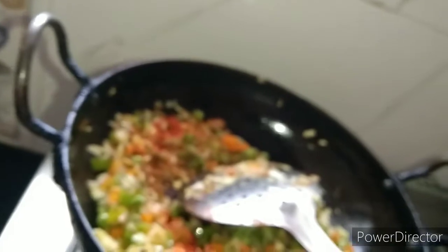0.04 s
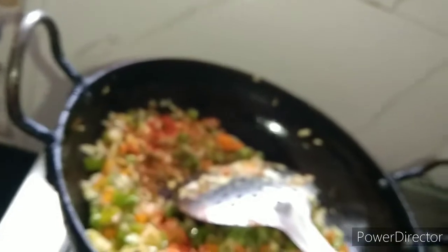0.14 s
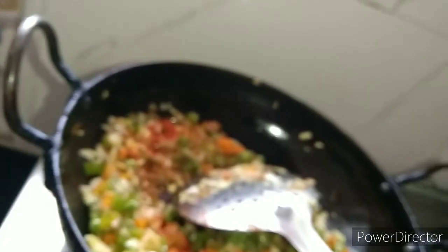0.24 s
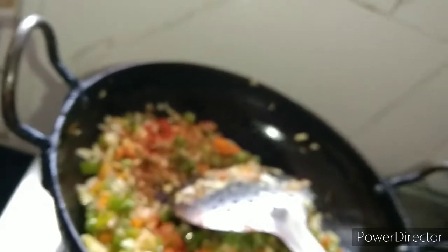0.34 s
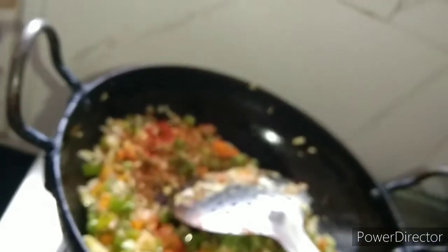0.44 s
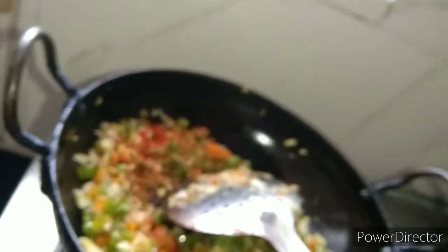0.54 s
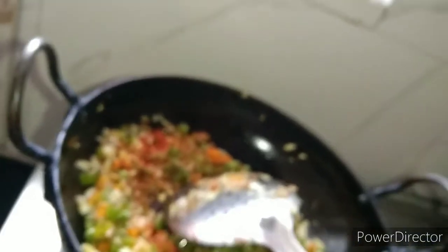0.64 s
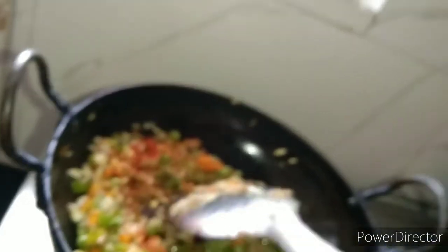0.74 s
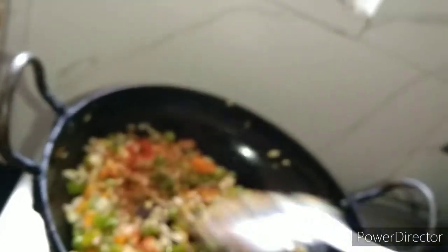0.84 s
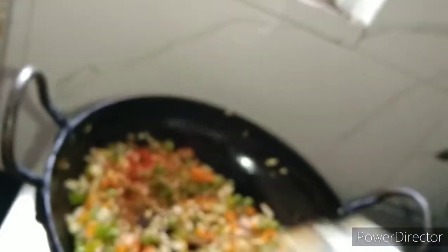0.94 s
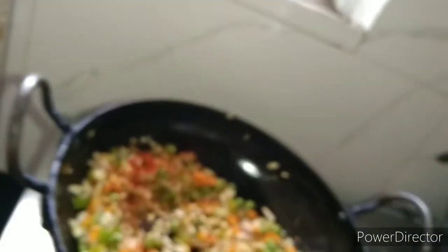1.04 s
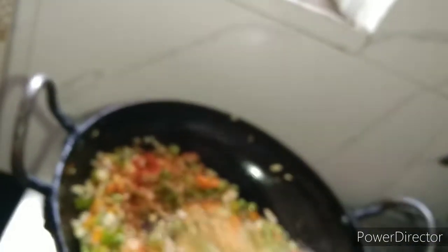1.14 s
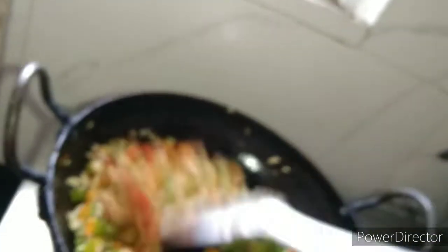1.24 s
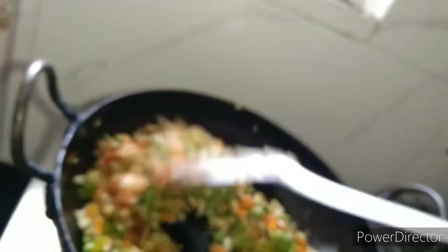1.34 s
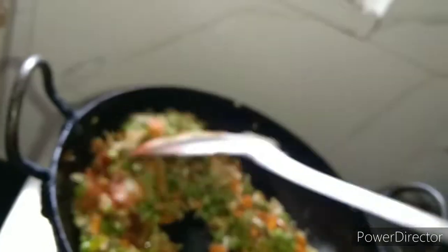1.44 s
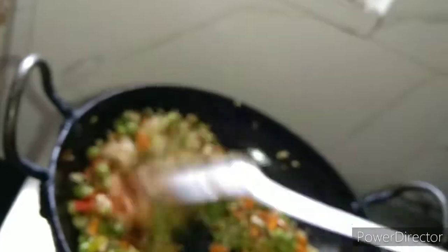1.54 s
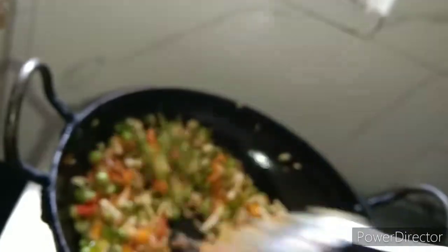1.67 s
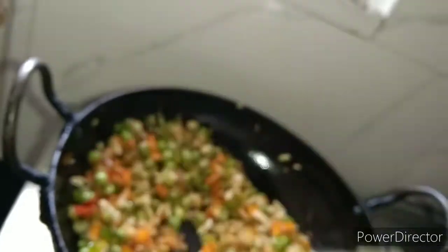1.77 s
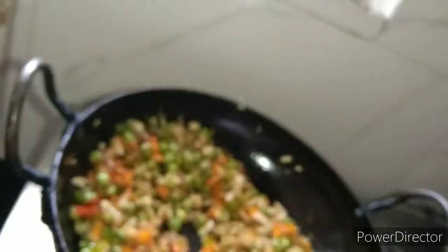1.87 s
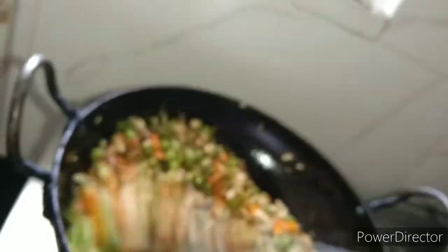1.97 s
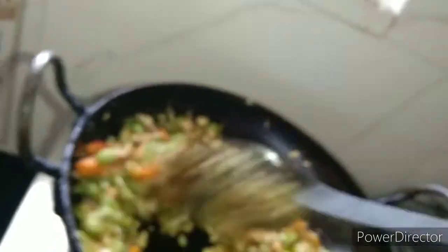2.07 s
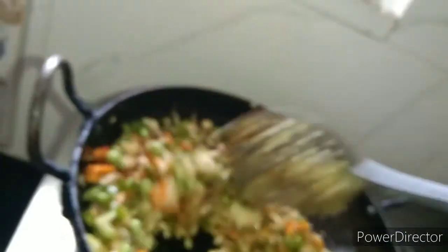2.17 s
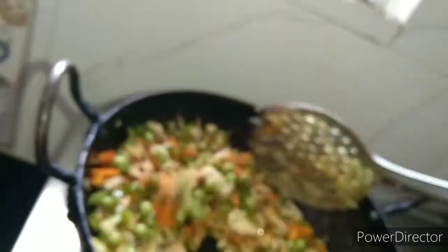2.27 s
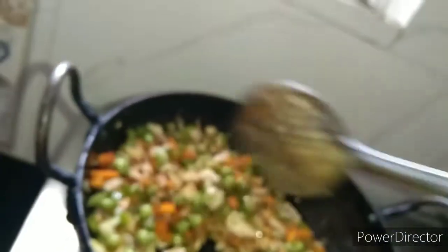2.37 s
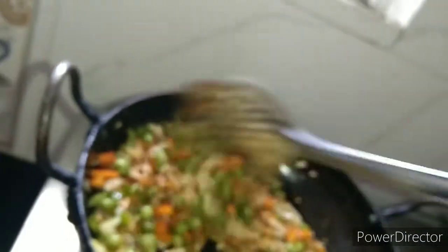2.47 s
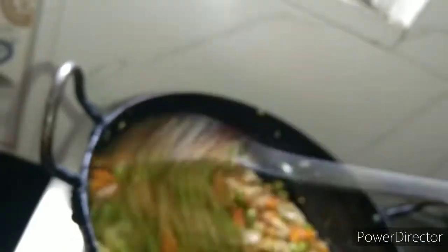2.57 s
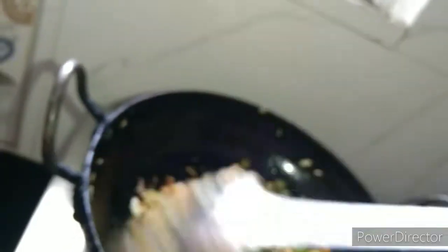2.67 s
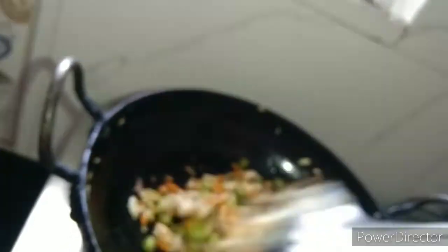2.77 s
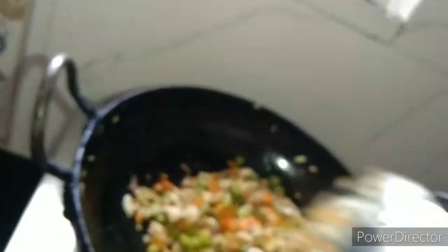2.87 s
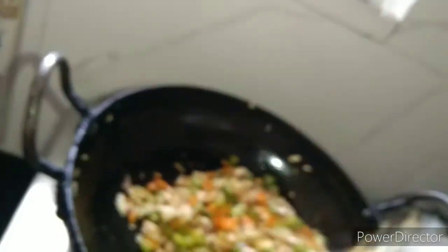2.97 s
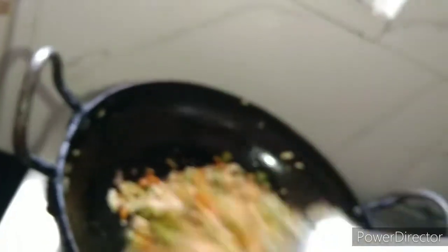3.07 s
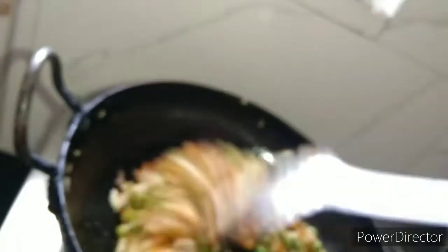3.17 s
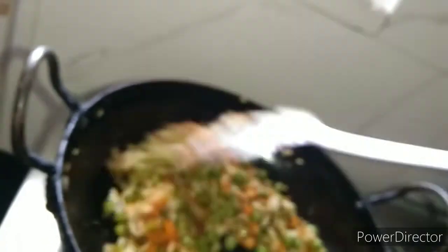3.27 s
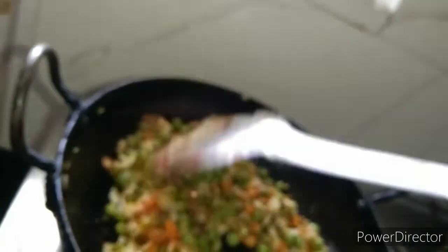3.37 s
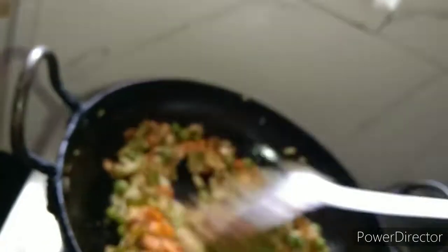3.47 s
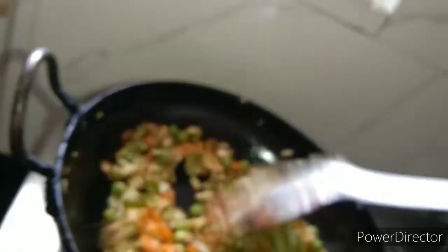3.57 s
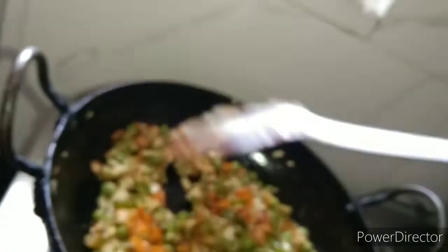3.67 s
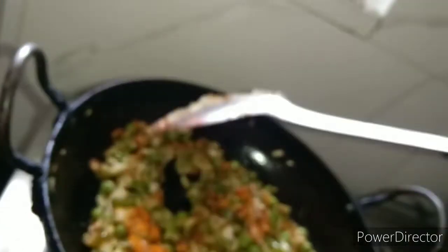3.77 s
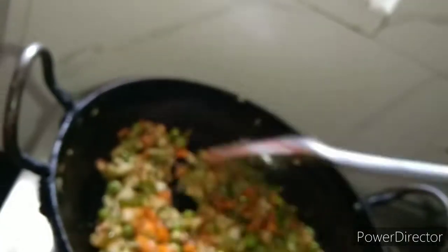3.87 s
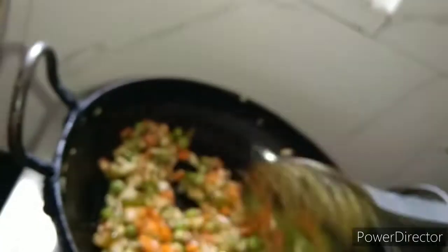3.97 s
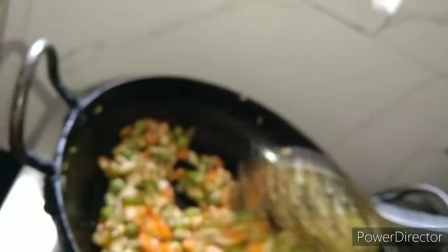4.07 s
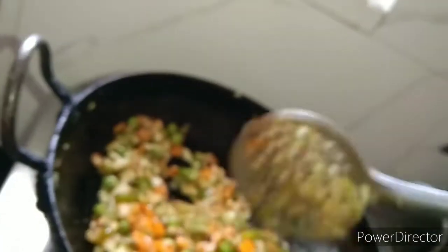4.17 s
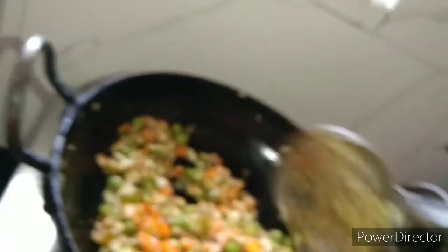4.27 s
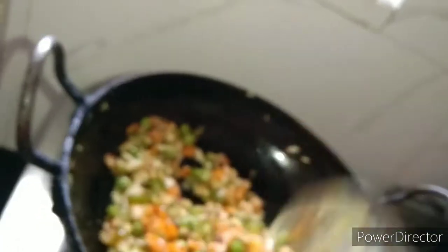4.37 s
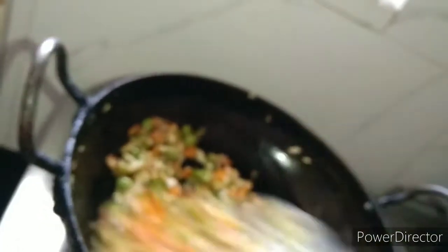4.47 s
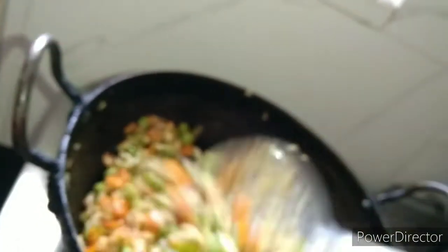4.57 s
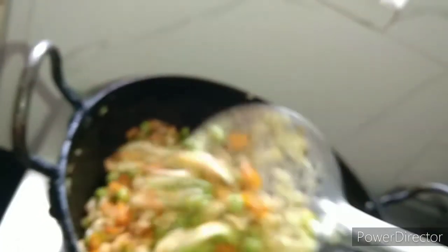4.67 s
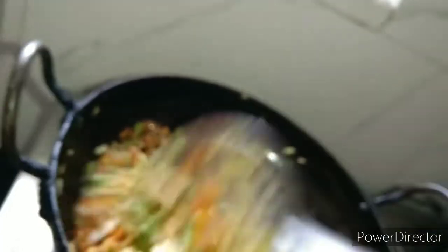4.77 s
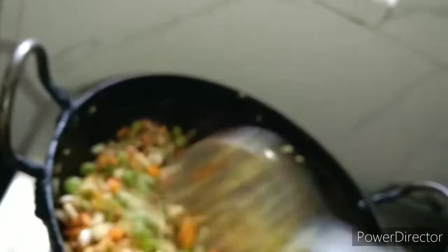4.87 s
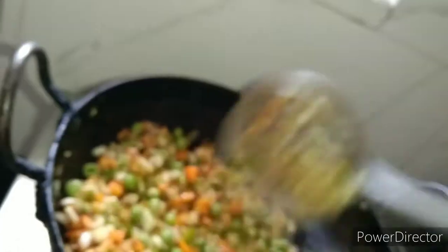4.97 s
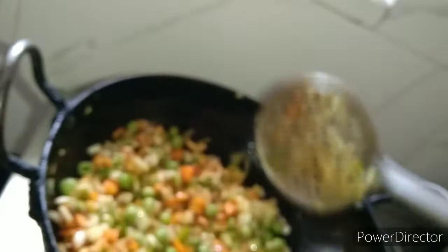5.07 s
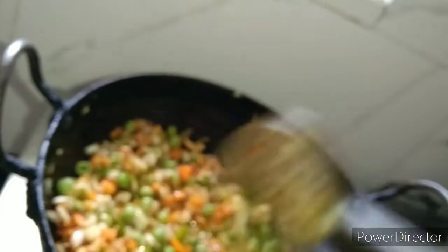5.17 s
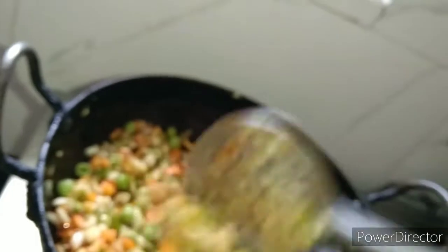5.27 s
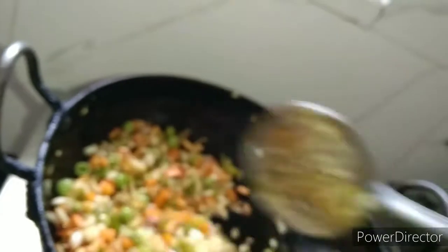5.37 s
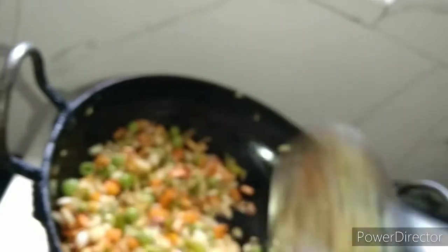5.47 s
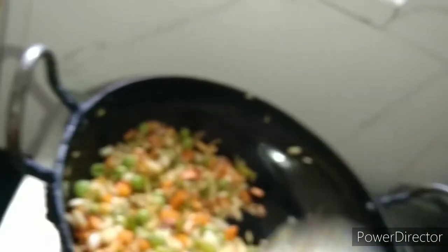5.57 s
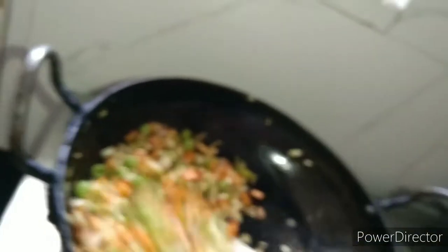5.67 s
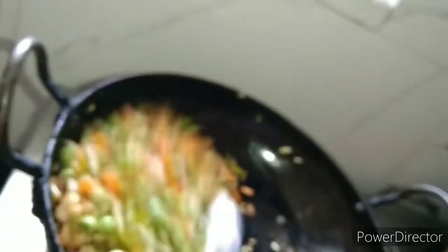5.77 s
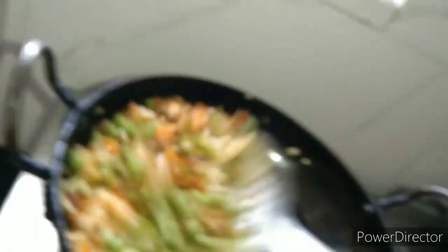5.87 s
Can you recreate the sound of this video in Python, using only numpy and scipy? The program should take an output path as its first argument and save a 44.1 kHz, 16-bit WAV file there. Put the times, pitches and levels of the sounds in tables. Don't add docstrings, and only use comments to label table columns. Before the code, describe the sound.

A metal spatula knocks and scrapes an iron pan as chopped vegetables, quiet at first, break into a strong steady sizzle in a hard-walled kitchen.

```python
import sys
import numpy as np
from scipy import signal
from scipy.io import wavfile
from scipy.ndimage import uniform_filter1d

SR = 44100
rng = np.random.default_rng(int(sys.argv[2]) if len(sys.argv) > 2 else 0)


def voltage_ratio(level):
    return 10 ** (np.asarray(level, float) / 20)


def persist_wave(psi):
    counts = np.round(np.clip(psi, -1, 1) * 32767).astype(np.int16)
    wavfile.write(sys.argv[1], SR, np.atleast_2d(counts).T)


N = 261513
CLOCK = np.arange(N) / SR

# time in seconds, sizzle level in dB.
SIZZLE_LEVEL = [(0.0, -56), (0.3, -54.5), (0.6, -58.5), (0.84, -56.5), (1.0, -55.5), (1.2, -57),
                (1.37, -39.5), (1.6, -41.5), (1.96, -38.5), (2.55, -43.5), (3.3, -39.5), (3.9, -39),
                (4.06, -39.5), (4.25, -37.5), (4.6, -40), (4.79, -43), (5.05, -40.5), (5.93, -40)]
# frequency in Hz, density in dB per Hz.
SIZZLE_COLOUR = [(880, -34), (1500, -16.5), (1870, -29.5), (2160, -13.5), (2370, -14.5), (3880, -3.5),
                 (4870, 1), (5280, -1), (6500, -1), (7460, 3), (10900, 5), (12200, 4.5), (14800, -5),
                 (15500, -7), (16000, -20)]
# frequency in Hz, density in dB per Hz.
SIMMER_COLOUR = [(71, -50), (120, -22), (243, -17.5), (376, -3.5), (404, -22), (446, -20), (551, 0),
                 (878, -6), (1010, 7.5), (1210, -4), (1420, -3), (1800, -2.5), (3500, -17.5), (4550, -85),
                 (7700, -120)]
# frequency in Hz, density in dB per Hz.
FLAME_COLOUR = [(12, -53), (20, 4), (35, -6.5), (54, -5), (78, -3), (103, -13), (113, -11), (160, -23),
                (210, -91), (350, -120)]
# centre in seconds, lift in dB, half length in seconds.
FLARES = [
    (0.415, 8, 0.23),
    (.85, 2, .08),
    (1.2, 1, .12),
    (1.98, 13, 0.16),
    (2.55, 4.5, 0.32),
    (3.8, 1, 0.54),
    (4.85, 6, 0.38),
    (5.85, 11.5, 0.14),
]
# frequency in Hz, density in dB per Hz.
AIR_COLOUR = [(59, -25), (100, -17), (257, -8.5), (282, -9.5), (369, -8.5), (686, -11.5), (874, -5),
              (948, -13.5), (2500, -32), (3250, -55), (5500, -120)]
# start in seconds, rise in seconds, length in seconds, drag on the bowl in dB,
# scratch of the edge in dB.
STROKES = [(0.0, 0.0017, 0.11, -47, -60), (0.104, 0.04, 0.087, -31, -44), (0.806, 0.042, .07, -42.5, -37.5),
           (0.866, 0.039, 0.095, -35, -34), (0.96, 0.033, 0.11, -46.5, -40.5),
           (1.295, .005, 0.037, -32.5, -21.5), (1.368, 0.037, 0.069, -34, -42),
           (2.486, 0.014, 0.08, -49, -61), (2.583, 0.0067, 0.037, -55, -35.5),
           (2.608, 0.054, 0.074, -62, -36), (3.174, 0.047, 0.18, -48.5, -32),
           (4.657, 0.047, 0.084, -34, -28.5), (4.738, 0.013, 0.16, -47.5, -51),
           (5.663, .008, 0.068, -79, -27.5), (5.683, 0.063, 0.058, -74, -31),
           (5.778, 0.045, 0.083, -78, -30.5), (5.843, 0.0073, 0.2, -36, -39)]
# frequency in Hz, width in Hz, level in dB.
BLADE_MODES = [(1010, 60, -8), (3000, 100, -12), (4230, 70, -2), (4660, 50, 0), (5020, 50, -1),
               (5600, 80, -5), (5890, 60, -5), (6320, 120, -1), (7520, 80, -2), (8280, 60, -4),
               (9550, 180, -5), (10600, 80, -6)]
# frequency in Hz, density in dB per Hz.
CRACK_COLOUR = [(1000, -20), (1700, -3), (2360, -4.5), (3040, 0.5), (3670, -1), (5540, -2.5), (6440, -3),
                (10700, -8.5), (14400, -16), (16000, -79)]
# frequency in Hz, density in dB per Hz.
THUD_COLOUR = [(88, -42), (150, -19.5), (269, -13), (427, -3.5), (552, -11), (669, 0.5), (1010, -1),
               (1280, -2.5), (1360, -6), (1520, -4), (1640, -10.5), (2010, -9.5), (2200, -14),
               (2860, -24.5), (4840, -120)]
# start in seconds, edge crack in dB, bowl thud in dB, ring in dB,
# contact time in seconds.
KNOCKS = [(0.1006, -17, -32.5, -41, 0.015), (0.1232, -24, -49, -22.5, 0.01),
          (0.139, -17.5, -30.5, -30.5, 0.0095), (0.8195, -49, -47, -60, 0.012),
          (0.8742, -26.5, -30.5, -49, 0.019), (1.2, -17, -33.5, -38, 0.013),
          (1.2919, -20.5, -21, -25, 0.0059), (1.3293, -32, -48, -30, 0.003), (1.4055, -41, -42, -47, 0.01),
          (2.585, -50, -64, -52.5, 0.007), (2.641, -50, -64, -52, 0.0059), (3.189, -36, -36.5, -53, 0.027),
          (3.2197, -10.5, -15.5, -25, 0.0051), (3.2267, -13, -21.5, -31, 0.0071),
          (3.2394, -39, -22.5, -38, 0.011), (4.0106, -28.5, -19, -32, 0.0063),
          (4.4126, -20.5, -26, -29, 0.011), (4.4543, -13.5, -18, -28.5, 0.0084),
          (4.666, -30, -42, -45.5, 0.015), (5.2695, -22, -23.5, -39.5, 0.0099),
          (5.5604, -18.5, -27, -31.5, 0.0094), (5.8451, -30, -52, -50, 0.025)]
STRUCK_SET = [0, 0, 0, 3, 3, 1, 2, 2, 3, 3, 3, 3, 4, 4, 4, 3, 6, 5, 3, 6, 6, 3]
# frequency in Hz, level in dB, t60 in seconds.
BLADE_RINGS = [
    [(1009, -11, .25), (2997, -14, .2), (5840, -5, .28), (9199, -4, .24), (10744, -4, .26),
     (12836, -5, .16), (13046, -2, .2), (14062, -11, .15)],
    [(1462, -6, .2), (3283, -2, .1), (4866, 0, .14), (6278, -2, .12), (7420, -2, .16), (10563, -4, .14)],
    [(2218, -9, .36), (2810, -6, .12), (3400, -7, .18), (4019, -1, .26), (4440, -9, .3), (5087, -5, .22),
     (5444, -3, .16), (6311, -6, .2), (7648, -10, .2)],
]
# frequency in Hz, level in dB, t60 in seconds.
DEEP_RINGS = [
    [(521, -7, .1), (683, -17, .25), (856, -10, .15), (1030, 1, .1), (1490, 0, .14)],
    [(1032, -7, .14), (2095, -8, .44), (2860, -3, .26), (3860, -5, .14), (3946, 2, .32), (4025, -4, .16),
     (4245, -5, .2), (4851, -6, .2), (7198, -11, .12), (8244, -8, .2)],
    [(727, -13, .9), (1023, -7, .4), (1451, -1, .3), (1518, -1, .52), (1780, -7, .12), (2150, -7, .1),
     (3280, -8, .1), (3898, -9, .1), (4831, -10, .3), (5486, -14, .1)],
    [(1040, -8, .12), (2890, -3, .14), (3140, -2, .22), (4533, -5, .1), (6138, -6, .12), (8144, -4, .08),
     (10528, -8, .08)],
]
HARDNESS = [0.806, .82, .05, 0.53, 0.65, 0.59, 0.85]
# start in seconds, level in dB, pitch in Hz.
SPITS = [(0.36, -37, 11200), (0.373, -32.5, 9560), (0.409, -41, 4850), (0.5267, -40, 4860),
         (0.582, -38, 4860), (0.6834, -42, 3760), (0.7686, -40, 6600), (0.98, -42, 4350),
         (1.011, -37, 9920), (1.021, -35, 10700), (1.1625, -39, 10900), (1.72, -44, 7540),
         (2.3196, -24, 4800), (2.38, -27.5, 10600), (2.678, -22.5, 4600), (2.8604, -23, 9500),
         (3.5404, -25.5, 8100), (3.874, -33, 4700), (4.9575, -26, 7500), (5.007, -26, 10400)]
# frequency in Hz, t60 in seconds.
HUM_MODES = [(163.5, 1.6), (433, .8)]
# start in seconds, first mode in dB, second mode in dB.
HUMS = [(1.201, -76, -41), (1.293, -58.5, -65), (3.221, -60, -47), (4.011, -58, -48.5), (4.412, -56, -57),
        (4.455, -58, -46), (4.56, -78, -41.5), (5.269, -53.5, -52), (5.562, -57, -48.5), (5.845, -79, -51)]
# centre in seconds, level in dB, pitch in Hz, half length in seconds.
BUMPS = [
    (1.844, -42, 61.5, 0.011),
    (1.926, -36.5, 57.4, 0.022),
]
# frequency in Hz, t60 in seconds.
ROOM_DECAY = [(150, 0.8), (500, 0.72), (1000, 0.65), (2000, 0.53), (4000, 0.42), (8000, 0.32),
              (15000, 0.39)]


def evened(x):
    return x / np.sqrt(np.mean(x ** 2) + 1e-20)


def read(points, hz):
    f, value = np.transpose(points)
    return np.interp(np.log(hz + 1), np.log(f + 1), value)


def add(mix, s, sound):
    part = mix[round(s * SR):][:len(sound)]
    part += sound[:len(part)]


def colour(x, spectrum):
    gain_db = np.maximum(read(spectrum, np.fft.rfftfreq(8192, 1 / SR)), -90)
    log_gain = np.log(voltage_ratio(gain_db))
    whole = np.concatenate([log_gain, log_gain[-2:0:-1]])
    minimum_phase = np.exp(np.conj(signal.hilbert(whole)))
    taps = np.fft.ifft(minimum_phase).real[:4096]
    return signal.oaconvolve(x, taps / np.linalg.norm(taps))[:len(x)]


def clicks(per_s, spread_db):
    when, sign = rng.random((2, N))
    size = voltage_ratio(spread_db * np.minimum(rng.exponential(1, N), 5))
    return evened((when < per_s / SR) * size * np.sign(sign - 0.5))


def patches(x, tilt_db, depth_db, flicker_db):
    hz, t, z = signal.stft(x, SR, nperseg=256)
    field = rng.standard_normal(z.shape)
    across_hz = uniform_filter1d(field, size=4, axis=0)
    patch = evened(uniform_filter1d(across_hz, size=16, axis=1))
    flicker = evened(uniform_filter1d(rng.standard_normal(len(t)), size=8))
    tilt = np.log2(hz[:, None] / 7000 + 0.16) * np.interp(t, CLOCK, tilt_db)
    gain = voltage_ratio(tilt + depth_db * patch + flicker_db * flicker)
    return signal.istft(z * gain, SR, nperseg=256)[1][:N]


def frying():
    sizzle_db = np.interp(CLOCK, *np.transpose(SIZZLE_LEVEL))
    above_full_db = sizzle_db + 41.5
    bursts = clicks(per_s=5000, spread_db=2.0) + 0.9 * rng.standard_normal(N)
    tilt_db = -6.5 + 0.34 * above_full_db
    fizz = evened(patches(colour(bursts, SIZZLE_COLOUR), tilt_db, depth_db=0.25, flicker_db=1.04))
    simmer = evened(colour(rng.standard_normal(N), SIMMER_COLOUR))
    simmer_db = -60 + 0.52 * above_full_db
    return voltage_ratio(sizzle_db) * fizz + voltage_ratio(simmer_db) * simmer


def burner():
    rumble = evened(colour(rng.standard_normal(N), FLAME_COLOUR))
    waver = evened(uniform_filter1d(rng.standard_normal(N), size=5000))
    flare_db = sum(db * np.exp(-((CLOCK - at) / half) ** 2) for at, db, half in FLARES)
    flame_db, waver_db = -68, 2
    return voltage_ratio(flame_db + flare_db + waver_db * waver) * rumble


def room_air():
    return voltage_ratio(-63) * evened(colour(rng.standard_normal(N), AIR_COLOUR))


def strokes():
    drag, scratch, free = np.zeros((3, N))
    for s, rise, length, drag_db, scratch_db in STROKES:
        t = np.arange(0, 1.3 * length, 1 / SR)
        progress = np.maximum(t - rise, 0) / max(length - rise, 0.01)
        press = np.minimum(t / rise, 1) * voltage_ratio(-34 * progress ** 2)
        bare = np.clip((scratch_db - drag_db) / 35, 0.067, 0.75)
        add(drag, s, voltage_ratio(drag_db - 3.5) * press)
        add(scratch, s, voltage_ratio(scratch_db - 12.5) * press * np.sqrt(1 - bare))
        add(free, s, voltage_ratio(scratch_db - 8) * press * np.sqrt(bare))
    slips = clicks(per_s=4000, spread_db=2.0)
    t = np.arange(3000) / SR
    blade = np.zeros(len(t))
    for hz, width, db in BLADE_MODES:
        dying = np.exp(-np.pi * width * t)
        blade += voltage_ratio(db) * np.sqrt(width) * dying * np.sin(2 * np.pi * hz * t)
    rung = signal.oaconvolve(free * slips, blade / np.linalg.norm(blade))[:N]
    return colour(drag * slips, THUD_COLOUR) + rung + colour(scratch * slips, CRACK_COLOUR)


def ring(hz, db, t60, split=0.016):
    t = np.arange(round(min(1.2 * t60, 0.7) * SR))[:, None] / SR
    detune = np.linspace(-1, 1, 5) + rng.uniform(-0.22, 0.22, 5)
    dying = voltage_ratio(db - 60 * t / t60 * (1 + 3 * detune ** 2))
    rise = np.minimum(t / 0.002, 1)
    partials = rise * dying * np.sin(2 * np.pi * hz * (1 + split * detune) * t)
    return partials.sum(axis=1) / np.sqrt(5)


def knocks():
    crack, thud, rings = np.zeros((3, N))
    t = np.arange(4000) / SR
    for (s, crack_db, thud_db, ring_db, contact), struck in zip(KNOCKS, STRUCK_SET):
        envelope = np.exp(-t / contact) * np.minimum(t / 0.001, 1)
        edge, body = rng.standard_normal((2, len(t))) * envelope
        edge = signal.lfilter([1, 1 - 2 * HARDNESS[struck]], 1, edge)
        add(crack, s, voltage_ratio(crack_db - 4.5) * edge)
        add(thud, s, voltage_ratio(thud_db - 7) * body)
        for mode in (BLADE_RINGS + DEEP_RINGS)[struck]:
            add(rings, s, voltage_ratio(ring_db) * ring(*mode))
    return colour(crack, CRACK_COLOUR) + colour(thud, THUD_COLOUR) + rings


def spits():
    out, t = np.zeros(N), np.arange(600) / SR
    for s, db, hz in SPITS:
        spray = colour(rng.standard_normal(len(t)), SIZZLE_COLOUR)
        pop = np.sin(2 * np.pi * hz * t) + 1.3 * spray
        dying = voltage_ratio(db - 9 - 60 * t / 0.02)
        add(out, s, dying * pop * np.minimum(t / 0.001, 1))
    return out


def bowl_hum():
    out, t = np.zeros(N), np.arange(SR) / SR
    for k, (hz, t60) in enumerate(HUM_MODES):
        level = np.zeros(N)
        for s, *levels_db in HUMS:
            add(level, s, voltage_ratio(levels_db[k] - 60 * t / t60) * np.minimum(t / 0.052, 1))
        waver = evened(uniform_filter1d(rng.standard_normal(N), size=3000))
        out += level * (1 + 0.47 * waver) * np.sin(2 * np.pi * hz * CLOCK)
    return out


def phone_bumps():
    out = np.zeros(N)
    for at, db, hz, half in BUMPS:
        t = CLOCK - at
        out -= voltage_ratio(db) * np.exp(-(t / half) ** 2) * np.cos(2 * np.pi * hz * t)
    return out


def kitchen(x):
    taps = np.zeros(SR)
    at = np.arange(200, SR - 20, 20)
    taps[at + rng.integers(0, 20, len(at))] = rng.choice([-1.0, 1.0], len(at))
    hz, t, z = signal.stft(taps, SR, nperseg=256)
    dying = voltage_ratio(-60 * t / read(ROOM_DECAY, hz)[:, None])
    tail = signal.istft(z * dying, SR, nperseg=256)[1]
    return signal.fftconvolve(x, tail / np.linalg.norm(tail))[:N]


def scene():
    close = strokes() + knocks() + spits()
    background = frying() + burner() + room_air()
    mono = background + close + voltage_ratio(-1.5) * kitchen(close) + bowl_hum() + phone_bumps()
    return np.array([mono, mono])


def band_limit(x):
    return signal.sosfilt(signal.butter(12, 16450, fs=SR, output="sos"), x)


def record(dry):
    heard = signal.sosfilt(signal.butter(4, 40, "high", fs=SR, output="sos"), dry)
    ceiling = 0.45
    rounded = ceiling * np.tanh(heard / ceiling)
    treble_cut = signal.firwin(255, 15650, window=("kaiser", 9), fs=SR)
    mix = signal.oaconvolve(rounded, treble_cut[None], "same")
    return band_limit(mix)


dry = scene()
out = record(dry)
persist_wave(out)
```